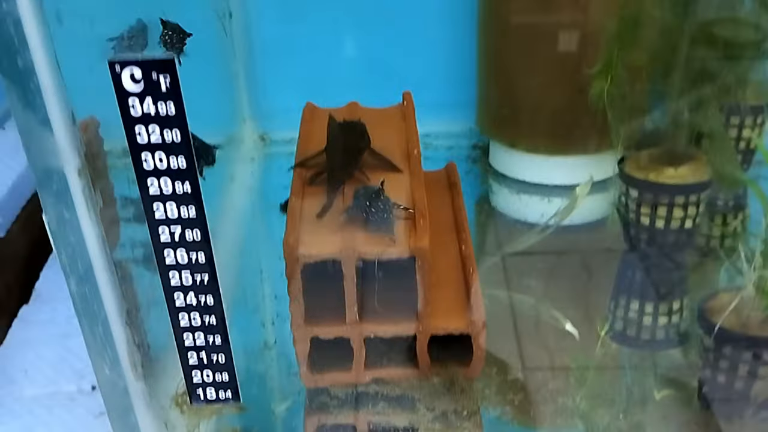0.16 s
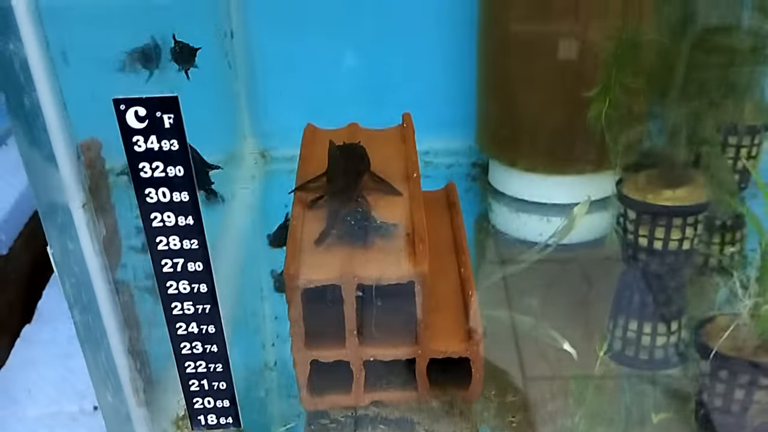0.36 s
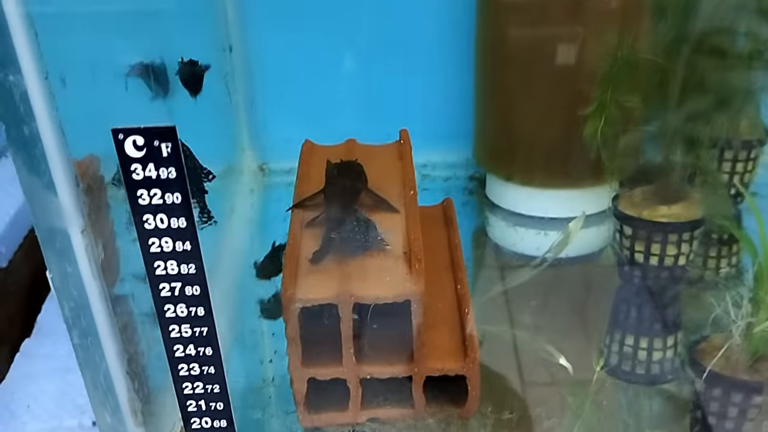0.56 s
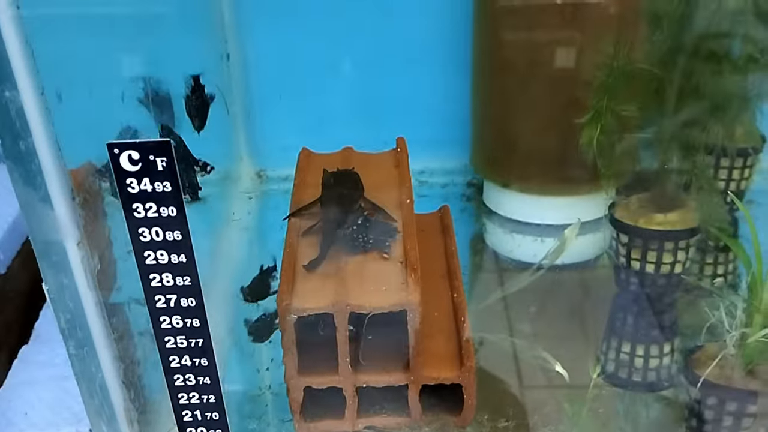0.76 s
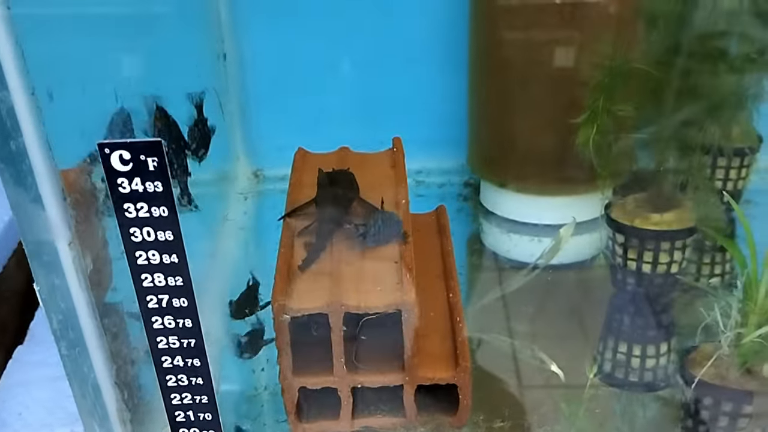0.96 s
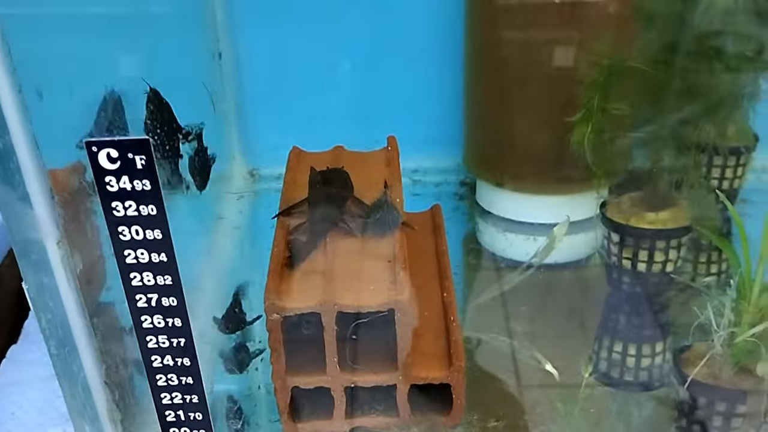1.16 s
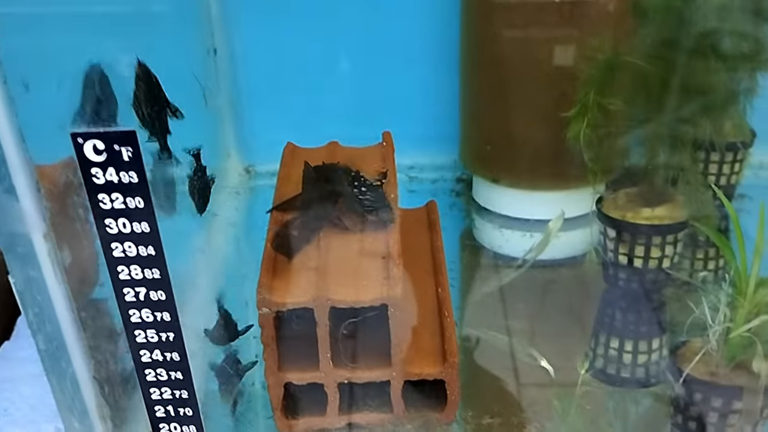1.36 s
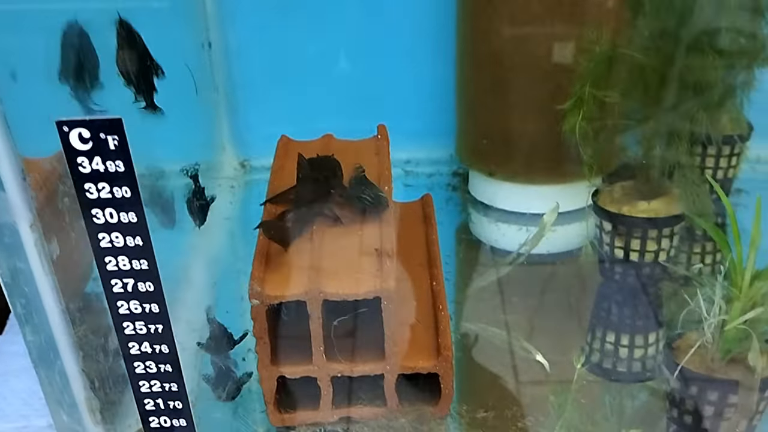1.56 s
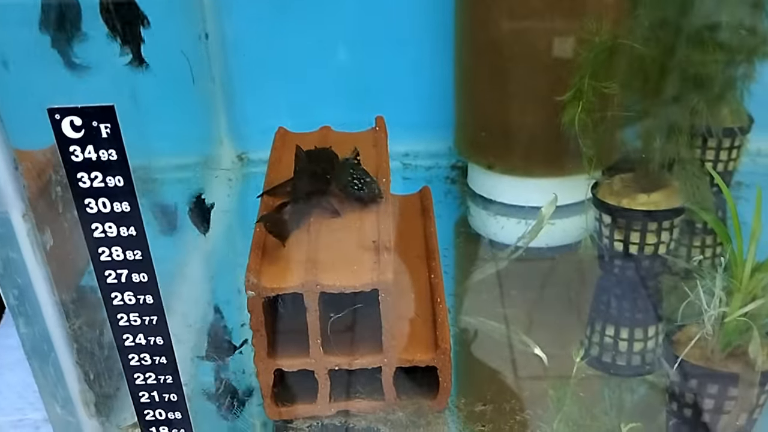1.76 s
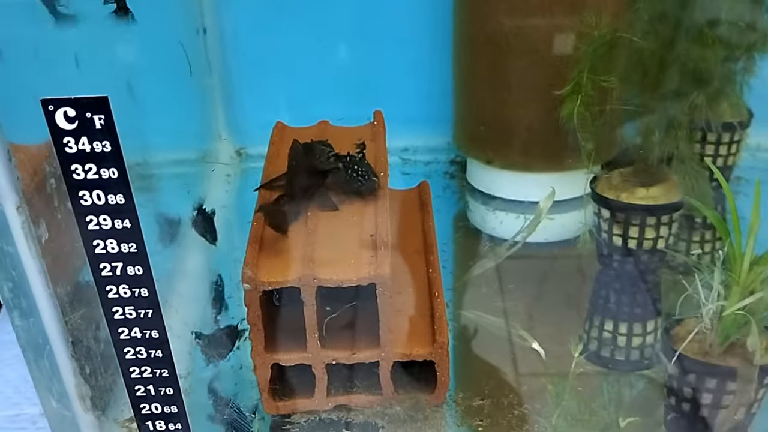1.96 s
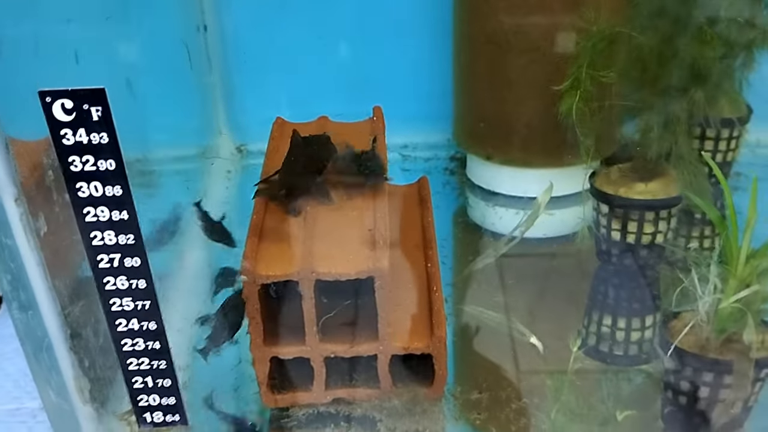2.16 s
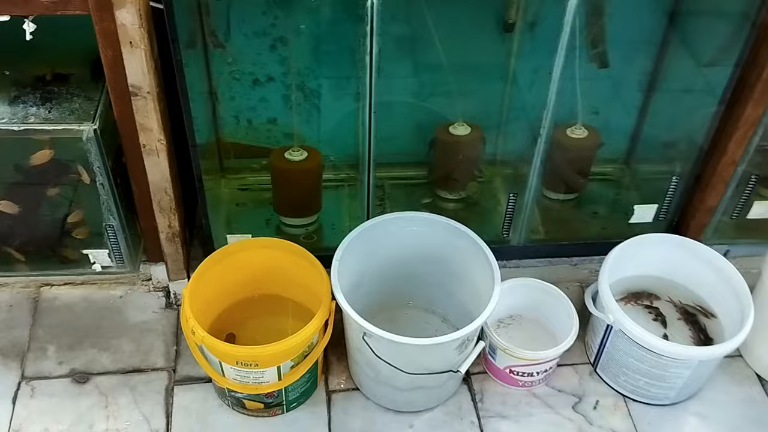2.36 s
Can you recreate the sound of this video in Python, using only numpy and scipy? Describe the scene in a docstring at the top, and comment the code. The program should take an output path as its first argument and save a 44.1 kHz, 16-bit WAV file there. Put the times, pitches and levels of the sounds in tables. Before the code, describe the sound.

An aquarium air pump drones with a deep, fast-throbbing hum and mains buzz, unchanging throughout; faint hiss pulses with it, and a tiny cluster of bubble ticks pops near half a second, in a room, stereo microphone.

```python
"""Air pump in a fish-tank room

A motor-driven air pump hums steadily: shaft thump, valve knock, mains buzz and their mixed tones,
all built from steady sines. A few small bubbles burst nearby, each a short damped ring.
Behind them lie room rumble and air hiss, made of shaped noise that puffs with each pump stroke."""
import sys
import numpy as np
from scipy import signal
from scipy.io import wavfile
from scipy.ndimage import uniform_filter1d

SR = 44100
rng = np.random.default_rng(int(sys.argv[2]) if len(sys.argv) > 2 else 0)


def boost_factor(decibels):
    """Convert a level in decibels to a linear amplitude factor."""
    exponent = np.asarray(decibels, float) / 20
    return 10 ** exponent


def wav_out(sig):
    """Save sig, one row per channel (or a flat mono array), as 16-bit PCM at SR to the path in sys.argv[1]."""
    wavfile.write(sys.argv[1], SR, np.round(np.clip(np.atleast_2d(sig).T, -1, 1) * 32767).astype(np.int16))


N = 106501  # length in samples

SHAFT_HZ, BUZZ_HZ = 43.2185, 100.07
STROKE_S, BUZZ_S = .0060, .0012  # first peak of the thump and of the buzz
SCATTER_DB = 2.5  # chance spread of tone levels


def read(points, hz):
    """Reads a table by straight lines on a log-frequency axis."""
    f, value = np.transpose(points)
    return np.interp(np.log(hz + 1), np.log(f + 1), value)


def evened(x):
    """Scales to rms 1."""
    return x / np.sqrt(np.mean(x ** 2) + 1e-20)


def drift(t, top_hz):
    """Slow wander of rms 1: sines from 0.2 Hz to top_hz, weaker as they get faster."""
    waves = [np.sin(2 * np.pi * (f * t + rng.random())) / np.sqrt(f)
             for f in np.geomspace(.2, top_hz, num=20)]
    return evened(sum(waves))


# Stereo balance, used by the tones and the air: (frequency [Hz], left minus right [dB])
SIDE_BALANCE = [(43, -.2), (90, .5), (150, 2), (260, .3), (450, -.5), (740, -1), (1220, -2), (2010, -5),
                (3330, -4), (5500, -1), (9080, -1), (15000, 0)]
# Stereo timing, used by the tones and the air: (frequency [Hz], phase lead of the left side [rad])
LEFT_LEAD = [(40, .05), (260, .15), (480, .6), (650, 1.1), (850, .6), (1250, 2.5), (1600, 2.8), (2000, .2),
             (4000, 0)]


def tones(hz, db, phase):
    """Steady sines; the room moves level and phase of each, more between the sides as pitch rises."""
    spread_hz = 450.
    chance = rng.standard_normal((len(hz), 2))
    apart = np.clip(hz / spread_hz, 0, 2) ** 2 / 2
    side = np.array([[.5], [-.5]])  # left, right
    level = boost_factor(db + side * (read(SIDE_BALANCE, hz) + SCATTER_DB * apart * chance[:, 1]))
    angle = phase + side * (read(LEFT_LEAD, hz) + apart * chance[:, 0])
    z = np.sqrt(2) * level * np.exp(1j * angle)
    # each sine is a turn up to a block's start times a turn within the block
    block = np.arange(1024) / SR
    starts = np.arange(N // 1024 + 1) * 1024 / SR
    inner = np.exp(2j * np.pi * hz[:, None] * block)
    outer = np.exp(2j * np.pi * starts[:, None] * hz)
    return np.array([((outer * c) @ inner).real.ravel()[:N] for c in z])


# Low multiples of the shaft rate: (multiple of shaft [-], level [dB rms])
SHAFT_ORDERS = [(1, -37.1), (2, -44.9), (3, -63.3), (4, -58.3), (5, -55.1), (6, -55.1), (7, -57.9),
                (8, -71), (9, -67), (10, -70), (11, -73), (12, -70), (13, -73)]


def thump_and_knock():
    """Each shaft turn repeats a thump (multiples 1-4) and a valve knock (above 4) that leads it."""
    knock_lead_s, knock_twist_rad, thump_twist_rad = .0041, -.85, .65
    k, db = np.transpose(SHAFT_ORDERS)
    thump = thump_twist_rad * (k - 1)
    knock = 2 * np.pi * SHAFT_HZ * k * knock_lead_s + knock_twist_rad
    phase = -2 * np.pi * SHAFT_HZ * k * STROKE_S + np.where(k > 4, knock, thump)
    return tones(k * SHAFT_HZ, db, phase)


# Mains buzz: (multiple of buzz [-], level [dB rms])
BUZZ_ORDERS = [(1, -45), (2, -71), (3, -69), (4, -70), (5, -77)]


def mains_buzz():
    """The mains buzz is a base tone and its multiples, lined up to peak together."""
    m, db = np.transpose(BUZZ_ORDERS)
    return tones(m * BUZZ_HZ, db, -2 * np.pi * BUZZ_HZ * m * BUZZ_S)


# Tones that a room resonance lifts: (multiple of shaft [-], multiple of buzz [-], level [dB rms])
LIFTED_TONES = [(1.5, 0, -63), (4, -1, -60), (5, -1, -66), (13, 1, -72), (15.5, 0, -72), (19, -1, -77),
                (18, 1, -78), (23, 0, -73), (28, 0, -79), (35.5, 1, -78), (41, 2, -79), (43, 2, -77),
                (44, 2, -72), (51, -1, -75), (46, 1, -75), (69, 0, -83)]


def lifted_tones():
    """Shaft tones, some shifted by the buzz, that stand out because a room resonance lifts them."""
    k, m, db = np.transpose(LIFTED_TONES)
    hz = k * SHAFT_HZ + m * BUZZ_HZ
    return tones(hz, db, 2 * np.pi * rng.random(len(hz)))


# The three level tables below hold for each tone before chance scatter.
# Upper shaft multiples, the valve knock: (frequency [Hz], level [dB rms])
KNOCK_LEVEL = [(600, -82), (840, -82), (1180, -85), (1600, -89), (2070, -86), (2500, -90), (2940, -91),
               (3600, -97)]
# Half multiples, as alternate strokes differ: (frequency [Hz], level [dB rms])
HALF_LEVEL = [(22, -82), (400, -83), (600, -80), (840, -87), (1180, -85), (1900, -89), (3000, -92),
              (3600, -97)]
# Shaft multiples shifted by the buzz, before BUZZ_SHIFTS is added: (frequency [Hz], level [dB rms])
MIXED_LEVEL = [(55, -76), (145, -72), (260, -75), (420, -80), (620, -82), (840, -83), (1200, -87),
               (1600, -91), (1920, -84), (2080, -82), (2250, -88), (2520, -96), (3600, -110)]
# Shifts: (multiple of buzz [-], change up to 1000 Hz [dB], change from 1900 Hz up [dB])
BUZZ_SHIFTS = [(1, 0, -1), (-1, 0, -1), (2, -8, 2), (-2, -16, -3), (3, -14, -3)]


def faint_tones():
    """Upper knock, half multiples, and the tones where shaft and buzz mix, at chance phases."""
    k = np.arange(1, 86)
    upper_hz = k[len(SHAFT_ORDERS):] * SHAFT_HZ
    half_hz = (k - .5) * SHAFT_HZ
    hz = [upper_hz, half_hz]
    db = [read(KNOCK_LEVEL, upper_hz), read(HALF_LEVEL, half_hz)]
    for m, low_db, high_db in BUZZ_SHIFTS:
        mixed_hz = k * SHAFT_HZ + m * BUZZ_HZ
        mixed_hz = mixed_hz[mixed_hz > 50]
        hz.append(mixed_hz)
        db.append(read(MIXED_LEVEL, mixed_hz) + read([(1000, low_db), (1900, high_db)], mixed_hz))
    hz, db = np.concatenate(hz), np.concatenate(db)
    db = db + SCATTER_DB * rng.standard_normal(len(hz))
    # leave out the tones that lifted_tones() plays
    k, m, _ = np.transpose(LIFTED_TONES)
    lifted_hz = k * SHAFT_HZ + m * BUZZ_HZ
    rest = abs(hz[:, None] - lifted_hz).min(axis=1) > .5
    return tones(hz[rest], db[rest], 2 * np.pi * rng.random(rest.sum()))


def pump():
    """All tones of the pump add up, and their common level wavers slightly."""
    waver_db = .2  # rms
    out = thump_and_knock() + mains_buzz() + lifted_tones() + faint_tones()
    return out * boost_factor(waver_db * drift(np.arange(N) / SR, top_hz=4.))


def blip(hz, cycles):
    """A short damped ring with a soft start, its pitch rising a little."""
    u = np.arange(600) / SR * hz / cycles  # time, 1 after the given cycles
    swell_and_fade = np.e * 3 * u * np.exp(-3 * u)
    return swell_and_fade * np.sin(2 * np.pi * cycles * u * (1 + 0.043 * u))


# Bursting bubbles: (time [s], peak level [dB], starting pitch [Hz], left minus right [dB])
BUBBLES = [(.4728, -41, 2400, -3), (.4759, -42, 2900, -6), (.4786, -42, 3200, -4), (.9697, -57, 6500, -8)]


def bubbles():
    """Single bubbles burst at the surface, each a tick that rings briefly."""
    out = np.zeros((2, N))
    for s, db, hz, pan_db in BUBBLES:
        at = round(s * SR)
        sides = boost_factor(db + pan_db * np.array([[.5], [-.5]]))
        out[:, at:at + 600] += blip(hz, cycles=2.) * sides
    return out


# Room rumble: (frequency [Hz], level [dB per Hz])
RUMBLE_LEVEL = [(10, -70), (30, -70), (55, -74), (90, -75), (115, -79), (150, -83), (172, -84), (200, -77),
                (222, -79), (240, -82), (290, -83), (320, -86)]
# Air hiss, before the puffs: (frequency [Hz], level [dB per Hz])
HISS_LEVEL = [(345, -87.5), (480, -86.5), (600, -96.5), (670, -81), (760, -94), (880, -87), (1000, -90),
              (1150, -91.5), (1250, -88), (1480, -95), (1720, -89.5), (1850, -95.5), (2000, -96.5),
              (2170, -88), (2400, -90.5), (2750, -97.5), (3300, -95.5), (4400, -103), (5000, -104),
              (6300, -103), (7500, -108), (8400, -112), (9200, -117), (9500, -132), (9900, -130),
              (10500, -121), (12400, -122), (13900, -113), (15700, -108)]
# How alike the two sides are: (frequency [Hz], likeness [0 to 1])
SIDE_LIKENESS = [(40, .93), (150, .72), (260, .85), (450, .6), (800, .5), (1300, .45), (1900, .15),
                 (2300, .3), (3500, .05), (6000, 0)]


def air():
    """Rumble and hiss are shaped noise with soft patches; the middle pitches puff with each stroke."""
    patchy_db = .7  # rms
    puff_lag_s = .0125  # from thump to puff
    puff_depth, puff_twice = .3, .2  # swing once and twice per stroke
    puff_hz, puff_top_hz = 450., 3500.  # range of pitches that puff
    frames, hz = N // 512 + 5, np.fft.rfftfreq(2048, 1 / SR)
    a, b, c, d, patches = rng.standard_normal((frames, 1025, 5)).T
    patches = uniform_filter1d(uniform_filter1d(patches, size=16, axis=0), size=4, axis=1)
    patches = evened(patches)

    # the right side is part left noise, delayed in phase, and part noise of its own
    same = np.clip(read(SIDE_LIKENESS, hz), -1, 1)[:, None]
    left = a + 1j * b
    shared = same * left * np.exp(-1j * read(LEFT_LEAD, hz))[:, None]
    z = np.array([left, shared + np.sqrt(1 - same ** 2) * (c + 1j * d)])

    # bring the noise to 0 dB per Hz, then shape it
    unit = np.sqrt(np.mean(signal.istft(z, nperseg=2048, noverlap=1536)[1] ** 2) / (SR / 2))
    balance = np.array([.5, -.5])[:, None, None] * read(SIDE_BALANCE, hz)[:, None]
    level = read(RUMBLE_LEVEL + HISS_LEVEL, hz)[:, None]
    z = z / unit * boost_factor(level + balance + patchy_db * patches)

    puffing = 1 / (1 + (puff_hz / (hz[:, None] + 1)) ** 2) / (1 + (hz[:, None] / puff_top_hz) ** 2)
    steady, middle = (signal.istft(z * g, nperseg=2048, noverlap=1536)[1][:, :N]
                      for g in (1 - puffing, puffing))
    turn = 2 * np.pi * SHAFT_HZ * (np.arange(N) / SR - STROKE_S - puff_lag_s)
    return steady + middle * (1 + puff_depth * np.cos(turn) + puff_twice * np.cos(2 * turn))


def scene():
    """Pump, bubbles and air sound together."""
    return pump() + bubbles() + air()


def low_pass(x):
    """Removes everything above the highest recorded frequency."""
    return signal.sosfilt(signal.butter(12, 16840, fs=SR, output="sos"), x)


def record(dry):
    """A steep low-pass filter removes the highest treble to finish the mix."""
    edge = signal.firwin(1023, 15780, window=("kaiser", 9), fs=SR)  # cutoff in Hz
    mix = signal.oaconvolve(dry, edge[None], "same")
    return low_pass(mix)


dry = scene()
out = record(dry)
wav_out(out)
```